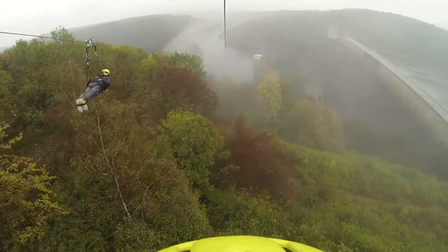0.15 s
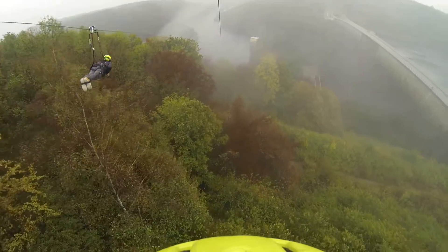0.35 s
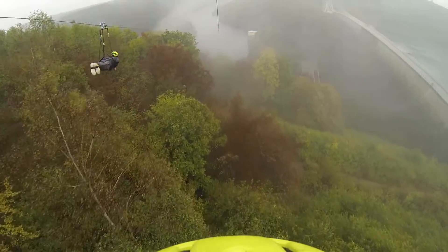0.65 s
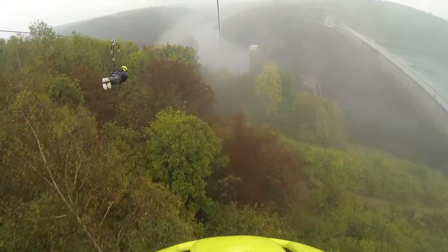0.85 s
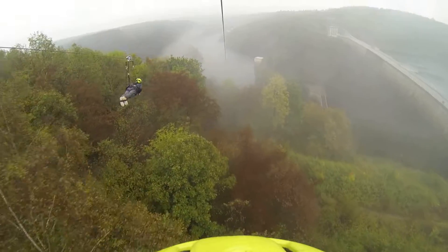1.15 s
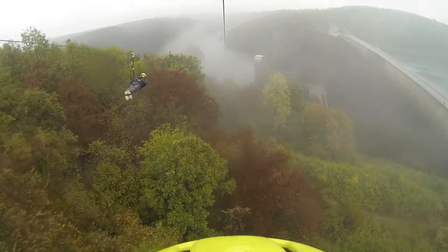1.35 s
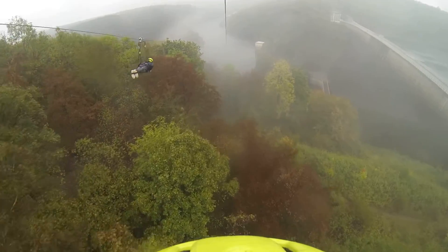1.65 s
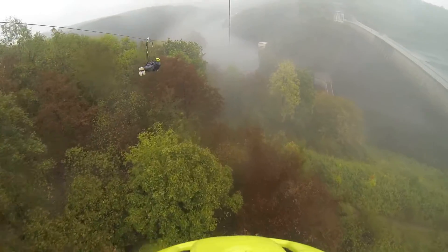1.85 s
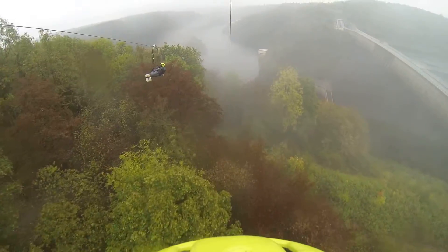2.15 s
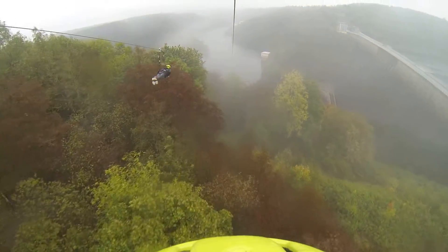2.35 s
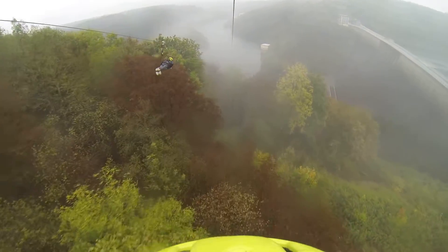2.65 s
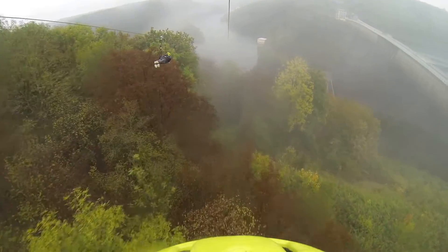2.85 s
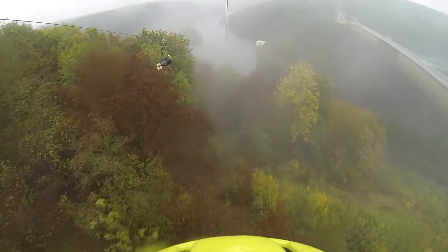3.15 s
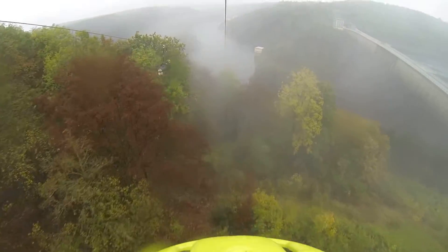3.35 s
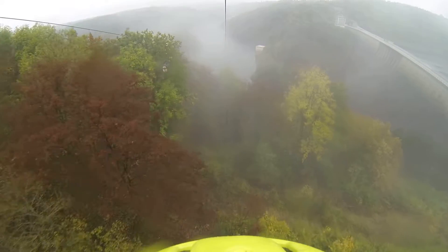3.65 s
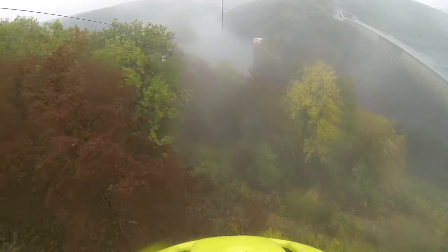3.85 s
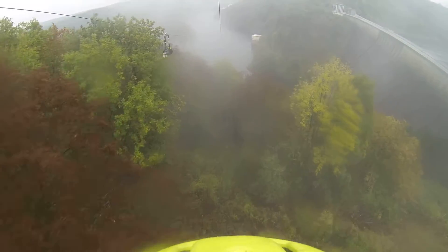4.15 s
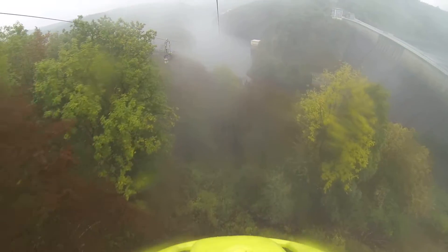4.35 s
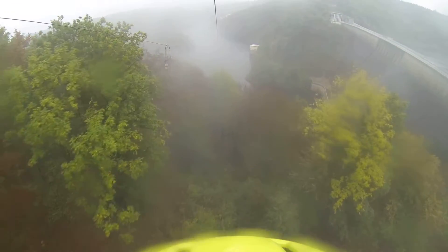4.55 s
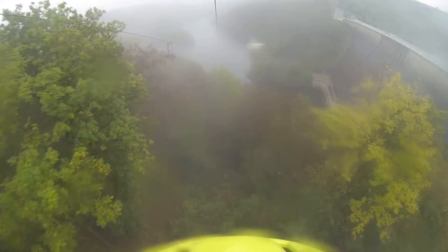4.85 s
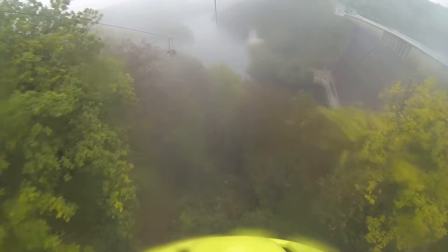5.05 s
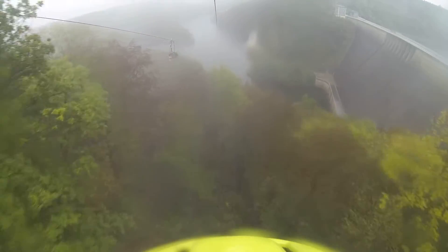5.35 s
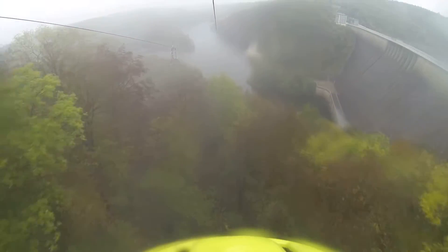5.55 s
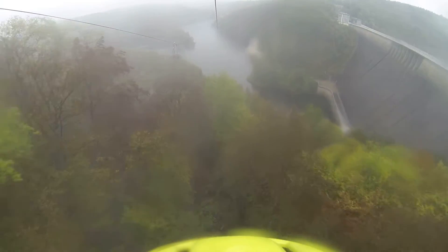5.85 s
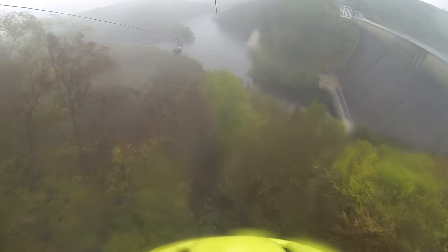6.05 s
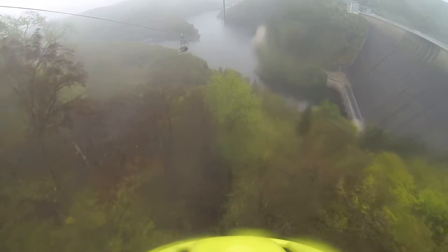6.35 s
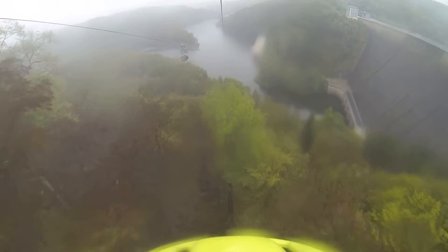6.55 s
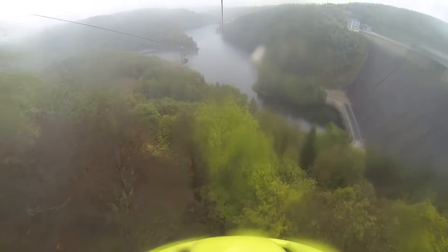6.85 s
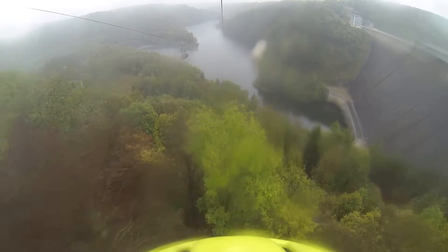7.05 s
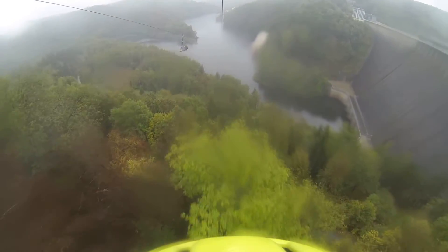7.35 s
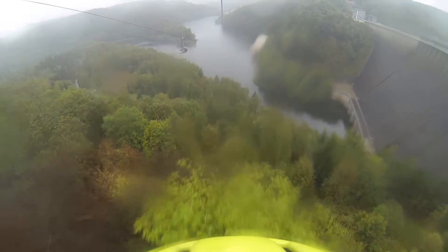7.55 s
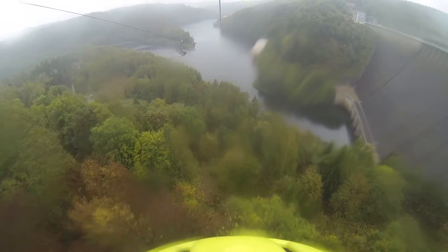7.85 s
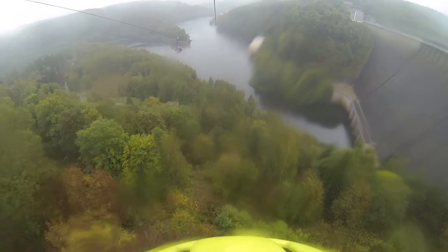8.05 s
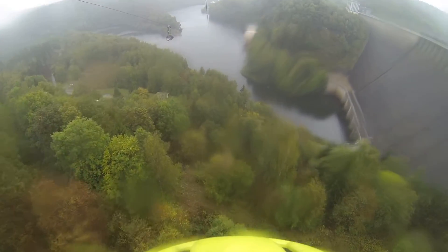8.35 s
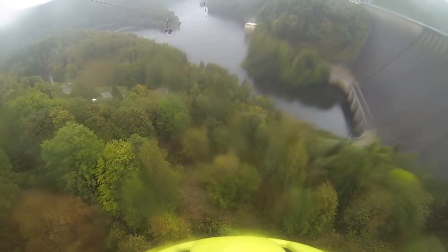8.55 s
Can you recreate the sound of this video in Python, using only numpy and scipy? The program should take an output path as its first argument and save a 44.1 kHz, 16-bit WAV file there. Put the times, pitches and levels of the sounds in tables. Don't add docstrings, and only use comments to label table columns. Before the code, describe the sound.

A zipline ride gathering speed in drizzle, heard from a sealed camera on the rider's helmet. A soft rising hum grows into a piercing, slightly wavering whine and a rough ringing whir with a bright sizzle. Low wind rumble and lumpy gusts swell beneath it. Crisp raindrop clicks become frequent and strong in the second half. A distant trolley fades within the first second or so. It ends at full speed, still roaring.

```python
import sys
import numpy as np
from scipy import signal
from scipy.fft import rfft, irfft, next_fast_len
from scipy.io import wavfile
from scipy.ndimage import uniform_filter1d

SR = 44100
rng = np.random.default_rng(int(sys.argv[2]) if len(sys.argv) > 2 else 0)


def gain_from_decibels(decibels):
    exponent = np.asarray(decibels, float) / 20
    return 10 ** exponent


def persist_wave(psi):
    counts = np.round(np.clip(psi, -1, 1) * 32767).astype(np.int16)
    wavfile.write(sys.argv[1], SR, np.atleast_2d(counts).T)


N = 384111
T = np.arange(N) / SR
SIZE = next_fast_len(N, True)

# time_s, strands_crossed_hz
STRAND_CLIMB = [(0, 225), (1.45, 444), (2.9, 661), (4.35, 864), (5.8, 1046), (7.26, 1213), (8.71, 1346)]
SURGE_HZ, SURGE_DIES_S = 29.6, 6.8
SURGE_PEAK_S, SURGE_S, QUICKEN_PER_S2 = 2.611, 1.166, .0083
TILT_LAG_TURNS = .25
TILT_BUILDS_S = 1.6
FULL_HZ = 1300

# multiple_of_strand_rate, into_harness_db, into_buckle_db, into_frame_db
WHINE_PARTIALS = [(1, 0, 0, -30), (2, -2.5, -10, 0), (3, -7, -15, -7), (4, -10, -14, -11.5)]
WHINE_DB_PER_HALVING = -8
NOTCH_HZ, NOTCH_WIDTH_HZ, NOTCH_DB = 960, 75, -11
# pitch_hz, width_hz, full_speed_level_db
HARNESS_MODES = [(297, 156, -47), (410, 150, -54), (722, 345, -40)]
BUCKLE_MODES = [(1222, 240, -36.5)]
FRAME_MODES = [(1470, 220, -28), (1710, 480, -22), (2430, 800, -27.5), (2877, 331, -30), (3278, 295, -25),
               (3660, 520, -12.5)]

# time_s, rolling_noise_db
WHEEL_LOAD = [(0.0, -39.5), (0.72, -39), (0.92, -36), (1.96, -36), (2.11, -33.5), (3.23, -30.5),
              (3.69, -27.5), (5.36, -23), (5.85, -20.5), (5.94, -23), (5.97, -20.5), (6.26, -22),
              (6.7, -19.5), (6.74, -23.5), (6.94, -19.5), (8.42, -17), (8.44, -19), (8.71, -17)]
# multiple_of_strand_rate, level_against_roar_db
UPPER_TONES = [(7.6, -19), (9.5, -19), (5, -18), (5.65, -17), (6.85, -19), (8, -21)]
# level_against_load_db, share_of_load, slope_db_per_halving, bend_db_per_halving_squared
MODE_GROUPS = [(-0.26, 1.095, 0.78, 0.35), (-7.5, 0.86, 10, -5), (-2.5, 0.88, -1.5, -0.5),
               (-14, 0.77, .5, -1.5)]
# pitch_hz, width_hz, level_db, full_tilt_shift_hz, full_tilt_gain_db, gain_db_per_halving
LOW_RING = [(1166, 360, -22.5, -4, -1.5, -0.5), (1590, 137, 3.5, -2, -0.5, 1),
            (1733, 229, 1.5, -18, -0.5, 4), (1867, 330, -4.5, -2, 1, -2)]
HIGH_RING = [(3690, 105, 0, 0, 0, 1), (3590, 120, -3.5, 0, 0, -.5), (3400, 250, -14, 0, 0, 0)]
BROAD_HISS = [(2160, 154, -1.5, 0, 1, 4.5), (2347, 214, 0, 6, 0, 6.5), (2620, 570, -1.5, 0, 0.5, 4.5),
              (3350, 1080, -0.5, 0, 0.5, 5.5), (3990, 380, 1, -2, 0.5, 4.5), (4333, 390, 2.5, 2, -0.5, -2),
              (4740, 350, -7, 50, 5.5, 7), (5150, 390, -3, 8, 0, 1), (5495, 340, -2.5, 60, 1.5, 0.5),
              (5880, 680, -7, 0, 0, 3)]
SIZZLE = [(6950, 510, 4, -110, 2, 2.5), (7100, 580, -8, 100, 12, 1), (7820, 420, -4.5, 140, 8, 3),
          (8200, 520, -4.5, -50, -4, 1.1), (8600, 3600, -5.5, 0, 3.5, -1.7), (9900, 2200, -9.5, 0, 2, 0),
          (11500, 510, -28, -1.5, 2.5, 9), (12400, 2100, -26, 0, 2.5, 5.5), (14500, 2000, -41, 0, -2, -2)]
# time_s, swell_db
RING_SWELLS = [
    (.5, -1),
    (1.15, 1),
    (1.7, -1),
    (3.45, 0),
    (4, -6),
    (4.8, 2.5),
    (5.4, 1.5),
    (6.25, -0.5),
    (7.26, -2.5),
    (8.35, 1),
]

# pitch_hz, density_db_per_hz
ROAR_COLOUR = [(65, -38), (110, -1), (135, -5), (204, -6), (249, -7), (303, -3), (409, -13.5), (551, -15),
               (637, -11.5), (900, -23.5), (1300, -16), (1690, -96), (2860, -120)]
BUFFET_COLOUR = [(45, -41), (60, -9), (95, 4.5), (115, -5), (140, -11), (200, -20.5)]
THUD_COLOUR = [(8, -19), (14, -4), (45, -12), (62, -7), (80, -45)]
ROAR_DB, ROAR_DB_PER_HALVING, BREEZE_DB = -31.5, -17, -60.5
BUFFET_DB, BUFFET_DB_PER_HALVING = -32, -11
THUD_DB, THUD_DB_PER_HALVING, SWAY_DB = -34, -10, -43.5
GUST_S = 0.17
# time_s, swell_db
GUSTS = [
    (.1, 5),
    (1.8, 1),
    (2.7, 0.5),
    (3.2, 5.5),
    (4.5, 3.5),
    (5.7, -2.5),
    (6.3, 4.5),
    (7.05, 5.5),
    (7.8, -3.5),
    (8.6, -2),
]
# time_s, swell_db
JOLTS = [
    (.55, 4.5),
    (3.2, -3),
    (4.5, 0),
    (5.4, -1),
    (5.8, 2.5),
    (6.3, -1),
    (6.85, -5),
    (7.3, 0.5),
    (8.7, 3.5),
]

# time_s, strand_rate_hz, level_db
NEIGHBOUR = [
    (0, 358, -85),
    (.2, 388, -62),
    (.35, 398, -64),
    (.45, 420, -61),
    (.7, 462, -68),
    (.92, 467, -65),
    (1.1, 478, -68),
    (1.25, 500, -84),
    (1.6, 510, -99),
]

# start_s, peak_db, dull_part_db
LARGE_DROPS = [(1.278, -39, 0), (1.3551, -37, -7), (1.9152, -36, 6), (1.9245, -36, 6), (2.5217, -33, 8),
               (2.5699, -31, -11), (3.1968, -26, -2), (3.3553, -19, 3), (3.4597, -26, -11),
               (3.4863, -25, 4), (3.5201, -24, 3), (3.8245, -26, -5), (4.1366, -24, -3), (4.2942, -19, -11),
               (4.5441, -22, -1), (4.9051, -21, -8), (4.934, -19, -4), (4.9495, -23, -2),
               (5.6633, -14.5, 6), (6.048, -17, -10), (6.5965, -14.5, 5), (6.7158, -11, 4),
               (6.9402, -16, -6), (7.0969, -11, -2), (7.1426, -19, 3), (7.2105, -16, 1), (7.4053, -19, -1),
               (7.5383, -10, 2), (8.4889, -14, -8), (8.5357, -14, -13)]
# pitch_hz, level_db, t60_s
SHELL_MODES = [(4750, -3, .005), (5450, -4, .003), (6200, -1, .003), (7700, 1, .003), (9200, 1, .0025),
               (10800, -5, .0025), (12600, -8, .002), (14400, -11, .002)]
MIST_PER_S, MIST_DB = 100, -3
DRIZZLE_PER_S, DRIZZLE_DB = 5, 14


def evened(x):
    return x / np.sqrt(np.mean(x ** 2) + 1e-20)


def curves(rows):
    s, *columns = np.transpose(rows)
    return [np.interp(T, s, column) for column in columns]


def wander(hz):
    coarse = rng.standard_normal(N // 16 + 2)
    lowpass = signal.butter(2, hz, fs=SR / 16, output="sos")
    smooth = signal.sosfilt(lowpass, coarse)
    return np.interp(np.arange(N) / 16, np.arange(len(coarse)), evened(smooth))


def bumps(rows, t):
    return sum(db * np.exp(-((t - s) / GUST_S) ** 2) for s, db in rows)


def swing(t):
    since = t - SURGE_PEAK_S
    return since / SURGE_S + QUICKEN_PER_S2 * since ** 2


def strand_rate(t):
    surge = SURGE_HZ * np.exp(-t / SURGE_DIES_S) * np.cos(2 * np.pi * swing(t))
    return np.interp(t, *np.transpose(STRAND_CLIMB)) + surge


def halvings(t):
    return np.log2(FULL_HZ / strand_rate(t))


def carried(modes, pitch):
    return sum(gain_from_decibels(2 * db) / (1 + (2 * (pitch - hz) / width) ** 2) ** 4 for hz, width, db in modes)


def whine():
    turns = np.cumsum(strand_rate(T) * (1 + .004 * wander(40))) / SR
    t = T[::64]
    bodies = [HARNESS_MODES, BUCKLE_MODES, FRAME_MODES]
    out = 0
    for k, *shares_db in WHINE_PARTIALS:
        pitch = k * strand_rate(t)
        power = sum(gain_from_decibels(2 * db) * carried(modes, pitch) for modes, db in zip(bodies, shares_db))
        notch_db = NOTCH_DB * np.exp(-((pitch - NOTCH_HZ) / NOTCH_WIDTH_HZ) ** 2)
        level = np.sqrt(2 * power) * gain_from_decibels(notch_db + WHINE_DB_PER_HALVING * halvings(t))
        tone = np.sin(2 * np.pi * k * turns)
        out = out + np.interp(T, t, level) * gain_from_decibels(1.5 * wander(8)) * tone
    return out


def group_db(group, t):
    db, share, slope_db, bend_db = group
    s, load_db = np.transpose(WHEEL_LOAD)
    below_db = np.interp(t, s, load_db) - load_db[-1]
    slower = halvings(t)
    return load_db[-1] + db + share * below_db + slope_db * slower + bend_db * slower ** 2


def ring(modes, hz, t):
    tilt = np.cos(2 * np.pi * (swing(t) - TILT_LAG_TURNS)) * np.minimum(t / TILT_BUILDS_S, 1)
    slower = halvings(t)
    power = 0
    for f, width, db, shift, tilt_db, slower_db in modes:
        away = 2 * (hz[:, None] - f - shift * tilt) / width
        power = power + gain_from_decibels(2 * (db + tilt_db * tilt + slower_db * slower)) / (1 + away ** 2) ** 2
    return np.sqrt(power / power.mean(0))


def strand_knocks():
    rate = strand_rate(T)
    turns = np.cumsum(rate * (1 + .006 * wander(50))) / SR
    out = 0
    for k, db in UPPER_TONES:
        carry = 1 / (1 + ((k * rate - 3670) / 330) ** 2)
        out = out + carry * gain_from_decibels(db + wander(2.2)) * np.sin(2 * np.pi * k * turns)
    return out


def rolling():
    knocks = strand_knocks()
    unsteady = gain_from_decibels(0.54 * wander(220) + 0.067 * wander(9.1))
    drive = (rng.standard_normal(N) + knocks) * unsteady
    hz, t, z = signal.stft(drive, SR, nperseg=1024, noverlap=768)
    modes_in_groups = [LOW_RING, HIGH_RING, BROAD_HISS, SIZZLE]
    swells_db = [0, bumps(RING_SWELLS, t), 0, 0]
    power = 0
    for modes, group, swell_db in zip(modes_in_groups, MODE_GROUPS, swells_db):
        power = power + (gain_from_decibels(group_db(group, t) + swell_db) * ring(modes, hz, t)) ** 2
    patches = uniform_filter1d(rng.standard_normal(z.shape), 12, 0)
    patches = uniform_filter1d(patches, 50, 1)
    flicker_db = 1.1 * rng.standard_normal(len(t))
    hiss = hz[:, None] > 4200
    power *= gain_from_decibels(2 * (1.5 * evened(patches) + flicker_db) * hiss)
    return signal.istft(z * np.sqrt(power), SR, nperseg=1024, noverlap=768)[1][:N]


def shaped(points, x):
    f, db = np.transpose(points)
    hz = np.fft.rfftfreq(SIZE, 1 / SR)
    gain = gain_from_decibels(np.interp(np.log(hz + 1), np.log(f + 1), db, left=-90, right=-90))
    return evened(irfft(rfft(x, SIZE) * gain, SIZE)[:N])


def wind():
    t = T[::64]
    slower = halvings(t)
    roar = np.hypot(gain_from_decibels(ROAR_DB + ROAR_DB_PER_HALVING * slower), gain_from_decibels(BREEZE_DB))
    buffet = gain_from_decibels(BUFFET_DB + BUFFET_DB_PER_HALVING * slower + bumps(GUSTS, t))
    thuds = np.hypot(gain_from_decibels(THUD_DB + THUD_DB_PER_HALVING * slower), gain_from_decibels(SWAY_DB)) * gain_from_decibels(bumps(JOLTS, t))
    out = 0
    for colour, level in [(ROAR_COLOUR, roar), (BUFFET_COLOUR, buffet), (THUD_COLOUR, thuds)]:
        out = out + shaped(colour, rng.standard_normal(N)) * np.interp(T, t, level)
    return out


def neighbour():
    hz, db = curves(NEIGHBOUR)
    turns = np.cumsum(hz * (1 + 0.0173 * wander(25))) / SR
    tone = np.sin(2 * np.pi * turns) + gain_from_decibels(-9) * np.sin(4 * np.pi * turns)
    return np.sqrt(2) * gain_from_decibels(db + 4.4 * wander(29)) * tone


def drops():
    t = np.arange(400) / SR
    rise = 1 - np.exp(-t / .00008)
    rings = np.array([rise * gain_from_decibels(db - 60 * t / t60) * np.sin(2 * np.pi * hz * t)
                      for hz, db, t60 in SHELL_MODES])
    sizzle_db = group_db(MODE_GROUPS[-1], T)
    mist = gain_from_decibels(sizzle_db + MIST_DB + 4 * np.minimum(rng.exponential(1, N), 4))
    mist = mist * (rng.random(N) < MIST_PER_S / SR)
    out = signal.oaconvolve(mist, rings[5:].sum(0))[:N]
    drizzle = gain_from_decibels(sizzle_db + DRIZZLE_DB + rng.normal(0, 2.5, N))
    drizzle = drizzle * (rng.random(N) < DRIZZLE_PER_S / SR)
    out += signal.oaconvolve(drizzle, rings[3:].sum(0))[:N]
    colours = rng.normal(0, 0.53, (len(LARGE_DROPS), len(SHELL_MODES)))
    dull = np.arange(len(SHELL_MODES)) < 3
    for (s, db, dull_db), colour in zip(LARGE_DROPS, colours):
        tick = gain_from_decibels(db + 6.5 + colour + dull_db * dull) @ rings
        start = round(s * SR)
        out[start:][:len(t)] += tick[:N - start]
    return out


def scene():
    mix = whine() + rolling() + wind() + neighbour() + drops()
    return mix[None]


def top_cut(x):
    return signal.sosfilt(signal.butter(12, 16270, fs=SR, output="sos"), x)


def record(dry):
    lower, upper = [signal.firwin(511, hz, window=("kaiser", 8), fs=SR) for hz in (15230, 15830)]
    edge = lower + gain_from_decibels(-26) * (upper - lower)
    mix = signal.oaconvolve(dry, edge[None], "same")
    return top_cut(mix)


dry = scene()
out = record(dry)
persist_wave(out)
```